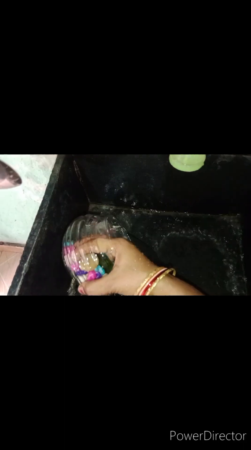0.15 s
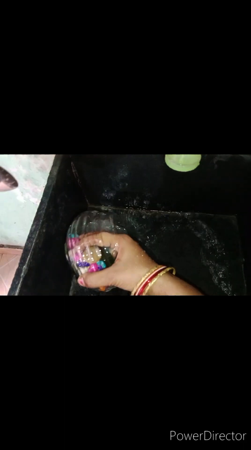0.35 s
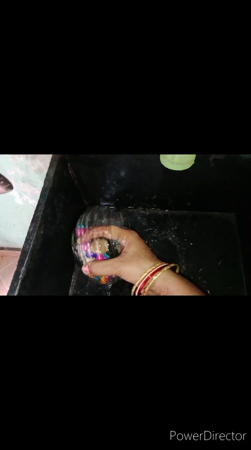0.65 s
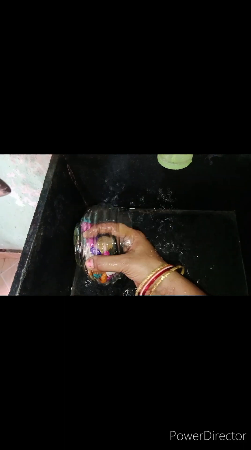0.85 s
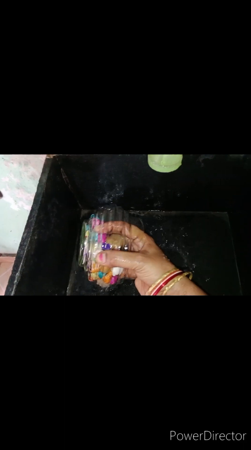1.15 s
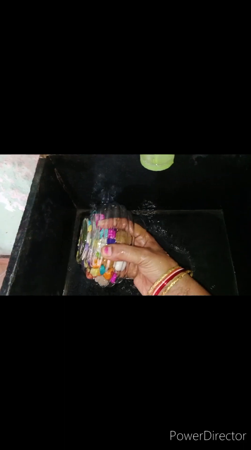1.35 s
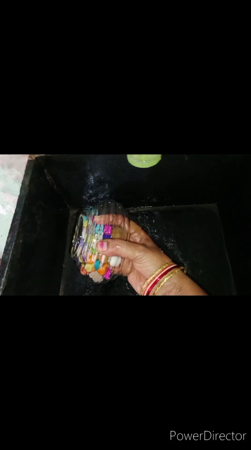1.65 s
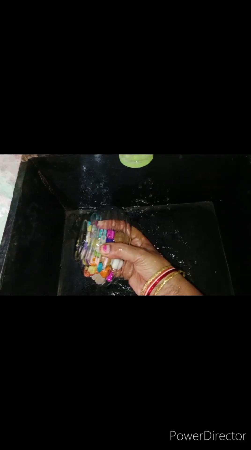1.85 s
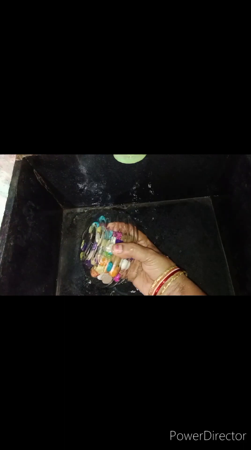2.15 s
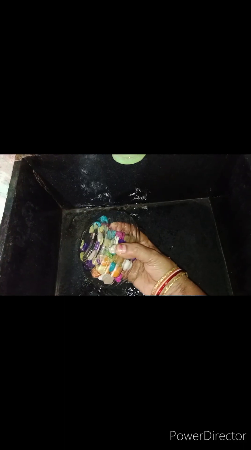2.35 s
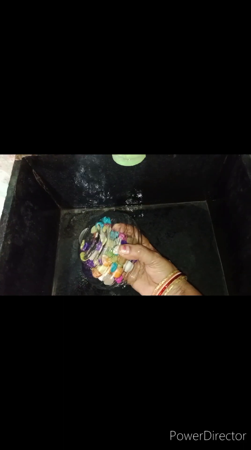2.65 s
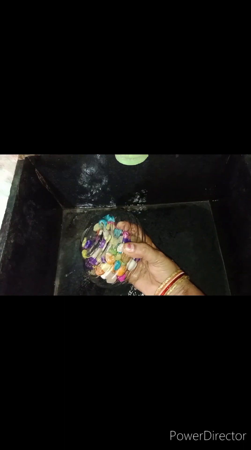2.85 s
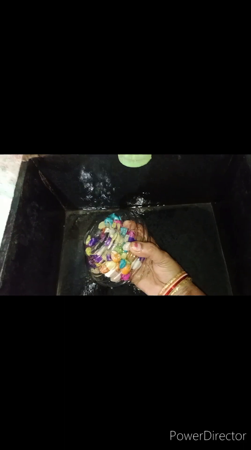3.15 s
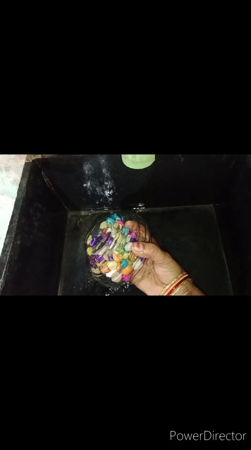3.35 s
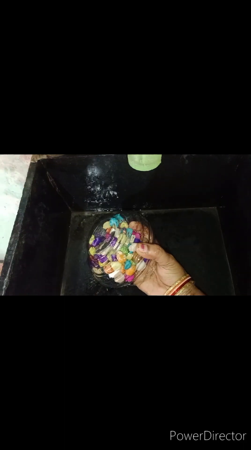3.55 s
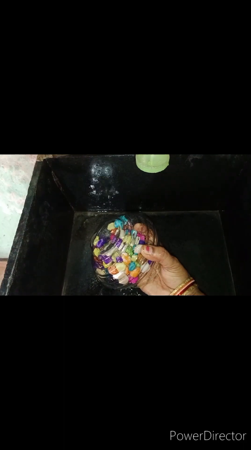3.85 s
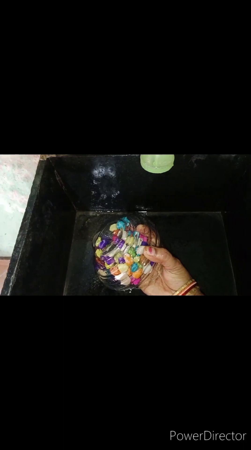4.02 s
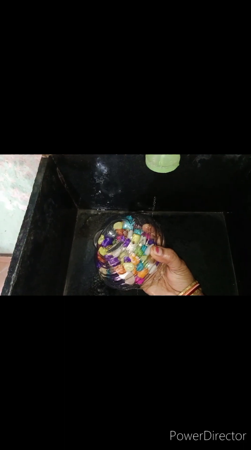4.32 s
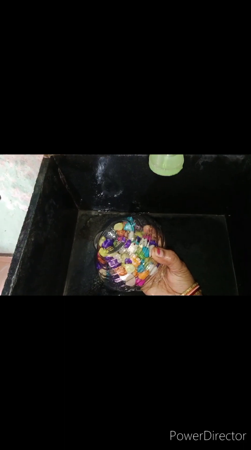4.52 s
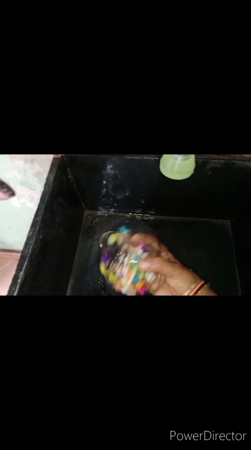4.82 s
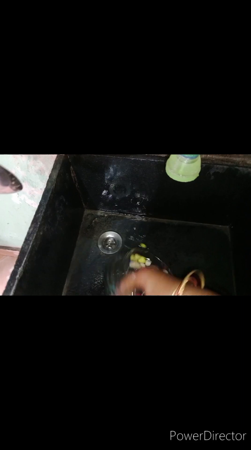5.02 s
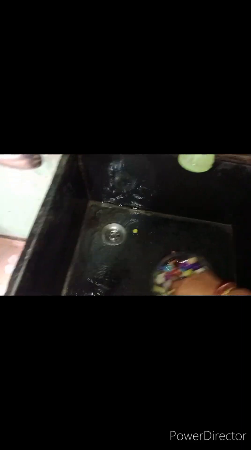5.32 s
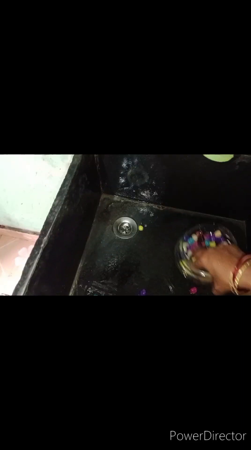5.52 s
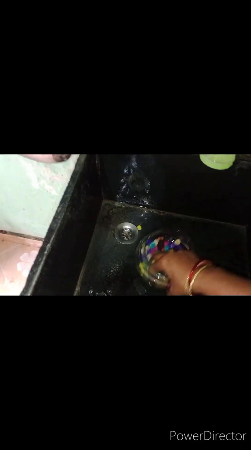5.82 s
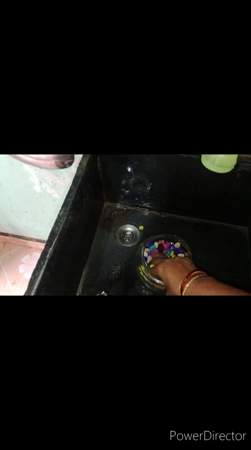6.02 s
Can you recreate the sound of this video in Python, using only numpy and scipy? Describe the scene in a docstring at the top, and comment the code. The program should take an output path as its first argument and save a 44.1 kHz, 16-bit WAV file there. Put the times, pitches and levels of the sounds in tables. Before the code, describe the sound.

Very close in a small hard kitchen, wet pebbles clack and clink in a glass bowl as rinse water gurgles out. A lull with drips follows, then bursts of hollow knocking and stone cracks. Finally the bowl is shaken hard, rubbing the stone sink with thumps of microphone overload, and after a short pause is set down.

```python
"""Wet pebbles in a glass bowl

A hand tips the bowl over a stone sink: blows and churned pebbles crack as noise bursts, and ring
tuned glass, the air in the bowl and the packed pile. The bowl hums in decaying sines, rubs along the
sink in dense slips and lands on the slab. Rinse water pours as filtered noise, gurgles in gliding sine
bubbles and drips in short ticks. Noise tails give a small kitchen's answer, over a quiet hush; all of
it is heard close up through a phone's microphone, with low thumps as it overloads."""
import sys
import numpy as np
from scipy import signal
from scipy.fft import rfft, irfft, next_fast_len
from scipy.io import wavfile

SR = 44100
rng = np.random.default_rng(int(sys.argv[2]) if len(sys.argv) > 2 else 0)


def master(y):
    """Save y as 16-bit WAV."""
    cut = np.clip(np.atleast_2d(y).T, -1, 1)
    pcm = np.round(cut * 32767)  # scale
    wavfile.write(sys.argv[1], SR, pcm.astype(np.int16))


N = 272538
TIME = np.arange(N) / SR
AGE = np.arange(SR // 3) / SR  # seconds since a contact; each is cut off after a third of a second

# Levels in the event tables are relative: each layer has its own trim in dB.
# Single pebble blows. Each row: time in seconds, peak level in dB, glass clink in dB against the blow.
PEBBLE_BLOWS = [(0.0532, 0.5, -13), (0.0687, -8, -11), (0.1206, -15, -8), (0.1483, -14.5, -5),
                (0.1942, -15.5, -6.5), (0.2741, -14.5, -9.5), (0.3205, -6, -15), (0.3617, -7.5, -2.5),
                (0.4191, -11.5, -6), (0.4487, -12.5, -8), (0.5245, -16.5, -23.5), (0.623, -34, -9.5),
                (0.6888, -12, -6.5), (0.7157, -9, -9), (0.7883, -25.5, -9.5), (1.3355, -20.5, -12.5),
                (1.3534, -19.5, -8), (1.4375, -19.5, -3), (1.6238, -6, -19), (1.6608, -2.5, -10.5),
                (1.6952, 1, -12), (1.7397, -1, -11.5), (1.7841, -4.5, -9), (1.8381, -6, -9),
                (1.9126, -2.5, -13), (1.9435, -9, -9), (1.9789, -8.5, -20.5), (2.074, -15, -19.5),
                (2.374, -33, -6), (2.452, -23, -9), (2.622, -18.5, -9.5), (2.6649, -4, -12),
                (2.6932, -5.5, -14.5), (2.802, -10, -23), (2.8567, -9, -12.5), (2.959, -12.5, -19),
                (2.9734, -3.5, -15), (3.0047, 1, -13.5), (3.7444, -7, -21.5), (3.7604, -7.5, -21),
                (3.8094, 1.5, -17.5), (3.8214, -0.5, -16.5), (3.8913, -1, -20.5), (3.9429, -11.5, -14),
                (3.9873, -4, -16.5), (4.009, -9, -18), (4.4897, -15, -12.5), (4.5241, -19.5, -12.5),
                (4.5661, -16, -12.5), (4.7447, -4.5, -18.5), (4.7999, -3.5, -14.5), (4.8232, -9.5, -16.5),
                (4.8694, -2.5, -10), (4.9003, 1, -12), (4.9104, -2, -11.5), (4.9369, -2.5, -14.5),
                (4.9653, -5, -17), (4.9925, -7.5, -13.5), (5.0326, -2.5, -20), (5.0668, -3.5, -19),
                (5.1078, -5.5, -6), (5.1345, -2, -10), (5.1979, 0.5, -22.5), (5.2448, -1.5, -25.5),
                (5.3532, -6.5, -19.5), (5.3948, -1.5, -19.5), (5.4158, -3, -32), (5.5242, -9, -18.5),
                (5.5495, -4, -35), (5.5712, -6.5, -37), (6.132, -12.5, -13.5), (6.153, -6.5, -20)]
# Blows that set the whole bowl humming. Each row: time in seconds, level in dB.
BOWL_HUMS = [(0.687, -31), (1.912, -20), (2.505, -51), (5.244, -13), (5.504, -21.5), (6.131, -13.5)]
# Low thumps as the microphone overloads on the hardest hits. Each row: time in seconds, level in dB.
MIC_OVERLOADS = [(1.77, -9.5), (3.811, -30.5), (3.891, -24), (4.747, -4.5), (4.8, -11), (5.03, -17),
                 (5.245, -16), (5.303, -9.5), (5.376, -19.5), (5.394, -7), (5.415, -11)]
# The bowl is put down on the stone. Each row: time in seconds, level in dB.
BOWL_LANDINGS = [(6.129, -14)]
# The clearest drops tick on the sink. Each row: time in seconds, level in dB.
CLEAR_DRIPS = [(0.876, -36), (0.9314, -42), (1.0051, -39), (1.2768, -35), (2.159, -36), (2.1971, -33.5),
               (2.3319, -38), (3.1483, -36), (3.3892, -42), (3.694, -29.5), (4.2343, -40), (4.2941, -40),
               (4.4404, -36.5)]
# Air gulps through the draining water. Each row: time in seconds, level in dB, starting pitch in Hz,
# glide in octaves per second (negative falls).
AIR_GULPS = [(.054, -18.5, 895, -6.5), (.06, -16.5, 1200, 5), (.123, -10, 1309, 11), (.452, -28, 1280, 4),
             (.51, -29, 1366, -1), (.569, -29.5, 1360, 10), (1.508, -27, 1363, 6.5), (2.71, -26, 1643, 1.5),
             (2.735, -32, 1370, 3), (2.772, -30.5, 1310, 6.5), (3.165, -49, 1850, -1.5),
             (3.302, -52, 3270, 3.5), (3.524, -37, 1572, 23)]
# Hand strokes that set the small stones jostling. Each row: start, peak and end in seconds,
# crack level in dB, clink level in dB.
CHURN_STROKES = [(0, .08, 0.5, -25.5, -27.5), (1.68, 1.85, 1.917, -17.5, -21.5),
                 (4.83, 5.21, 5.58, -14.5, -26)]
# Strokes in which the bowl rubs on the sink. Each row: start, peak and end in seconds,
# rumble level in dB, scrape level in dB.
RUB_STROKES = [(1.37, 1.48, 1.57, -46.5, -66), (1.72, 1.93, 2.005, -52, -43), (4.59, 4.62, 4.72, -34, -30),
               (4.75, 4.95, 5.52, -35, -33)]
# Flow of the running water. Each row: time in seconds, level in dB.
WATER_FLOW = [(0, -40), (.45, -47.5), (.62, -59.5), (1.1, -62), (1.3, -65.5), (2.25, -69), (2.7, -49),
              (3.4, -71), (6.18, -79.5)]
# The hand cups the bowl's mouth and the knock turns hollow. Each row: time in seconds,
# hollow share of the knock's power from 0 to 1.
CUPPED_SHARE = [(1.3, 0.05), (1.65, 0.72), (1.95, 0.87), (2.2, 0.04), (6.1, 0.3)]
# The pile's knock against the crack as the bowl is turned. Each row: time in seconds, level in dB.
PILE_KNOCK_LEVEL = [(.75, -28), (1.34, -18), (1.66, -20.5), (1.8, -1), (1.95, -0.5), (2.07, -23),
                    (2.66, -15), (2.86, -28.5), (3.75, -17.5), (4.5, -12), (4.9, -9), (5.5, -13.5)]

# Ringing of the glass. Each row: mode in Hz, width in Hz, level in dB drained, level in dB holding water.
GLASS_MODES = [(1772, 21, -9, 6.5), (2242, 71, -6.5, 1.5), (2386, 26, -3, -1), (2644, 29, -8.5, -8),
               (2889, 65, -7, 6), (3033, 19, -3.5, -9.5), (3137, 100, 0.5, -24), (3314, 43, 0, 2.5),
               (3560, 20, -5, -2.5), (3790, 25, -6.5, -36.5), (3876, 90, -10.5, -2), (4250, 29, -10, -15.5)]
# Highest modes of the glass. Each row: mode in Hz, width in Hz, level in dB.
CHIME_MODES = [(6850, 60, -2), (7170, 50, -2), (7710, 50, -2), (8490, 70, -5), (9790, 80, 0),
               (10290, 80, -1), (11900, 100, -3)]
# Air in the bowl. Each row: mode in Hz, width in Hz, level in dB.
HOLLOW_MODES = [(890, 34, 4), (968.6, 25, 2), (2152, 110, -3.5)]
# The packed pebbles and sink. Each row: mode in Hz, width in Hz, level in dB.
PILE_MODES = [(1080, 63, -16), (1274, 26, 10.5), (1370, 110, 10.5), (1686, 39, -8), (1700, 25, -14.5)]
# The many pitches of the stones, blurred together. Each row: centre in Hz, width in Hz, level in dB.
CLATTER_BANDS = [(1500, 400, -5), (2250, 230, -3), (3200, 1000, 0), (4350, 400, -5)]

# Tone curves; only their shape counts. Stone on stone. Each row: frequency in Hz, level in dB per Hz.
CRACK_TONE = [(4000, -45), (4900, -30), (5400, -13), (6000, -9), (6700, -2), (8000, -2), (8800, -5),
              (9400, -11), (9850, 1), (10600, 0), (11400, -5), (12500, -6), (13900, -14), (15400, -13),
              (15900, -50)]
# The microphone's overload. Each row: frequency in Hz, level in dB per Hz.
OVERLOAD_TONE = [(20, -38), (45, -17.5), (75, -2), (230, 0), (600, -4), (1200, -11.5), (3000, -35.5)]
# The struck stone slab. Each row: frequency in Hz, level in dB per Hz.
SLAB_TONE = [(88, -45), (150, -36), (588, -18), (661, -20.5), (780, -19), (837, -15), (1400, -15.5),
             (2280, -33.5), (2500, -40), (3250, -60), (5500, -120)]
# Low part of the rubbing. Each row: frequency in Hz, level in dB per Hz.
RUMBLE_TONE = [(30, -18), (70, -10), (110, -4), (170, -0.5), (240, -4.5), (340, -28.5), (700, -39.5),
               (4000, -100)]
# Upper part of the rubbing. Each row: frequency in Hz, level in dB per Hz.
SCRAPE_TONE = [(150, -37.5), (280, 4), (450, 6.5), (560, 5), (700, -9), (1100, -26), (2500, -57.5),
               (5000, -100)]
# Fizz of the pour. Each row: frequency in Hz, level in dB per Hz.
POUR_TONE = [(300, -3), (650, -8.5), (1000, -15.5), (1400, 3), (2300, -6.5), (3400, -13), (4800, -37.5),
             (7000, 0.5), (12000, -7), (16000, -24)]
# A drop on wet stone. Each row: frequency in Hz, level in dB per Hz.
TICK_TONE = [(1500, -24), (3300, -18), (4800, -40), (6000, -18), (7000, 0), (9300, -5), (10300, 0),
             (13000, -6), (15800, -13)]
# Hush of the kitchen. Each row: frequency in Hz, level in dB per Hz.
HUSH_TONE = [(15, -29.5), (25, -2), (43, -17), (141, 14), (200, -1.5), (545, -1), (1040, -8.5), (1330, 3),
             (1650, -21), (4870, -29), (6210, -29.5), (7510, -19), (9320, -22.5), (10700, -7.5),
             (16000, -39)]

DRAINED_S = 1.1  # the bowl holds water until then
REBOUND_S, REBOUND_SCATTER_S, REBOUND_DB = .016, .0059, -10  # a stone falls back on its neighbours
# A blow that meets the glass squarely also knocks the pile harder (dB per dB, dB).
KNOCK_FOLLOWS_GLASS, USUAL_CLINK_DB = .43, -7.5
HUM_FULL_HZ, HUM_DRAINED_HZ, HUM_SCATTER_HZ = 697, 642.6, 8.5  # lowest mode, with and without water
HUM_T60 = .2  # seconds; the hand damps the bowl
DRIPS_PER_S, STRAY_DRIP_DB = 3, -46  # fainter drops at random, before the drip trim
HUSH_DB = -70
NOTCH_HZ, NOTCH_WIDTH_HZ, NOTCH_DB = 4763, 130, -8.5  # band swallowed by the microphone's port
TOP_HZ = 15700  # nothing is kept above


def pebbles(crack_db=-2, clink_db=-2, hollow_db=0, knock_db=-1,
            churn_db=-2, churn_clink_db=-3, churn_knock_db=0, clatter_db=-7):
    """Blows and churning crack, ring the glass and the air inside it, and knock the pile."""
    crack, clink, knock, tinks = blows()
    stirring = strokes(CHURN_STROKES, axis=3, swell_db=8.5, sag_db=0, attack_s=.054, release_s=.14)
    on_glass = strokes(CHURN_STROKES, axis=4, swell_db=5.5, sag_db=12, attack_s=.072, release_s=.15)
    stone_rattle = jostle(rate=260, spread_db=2, t60=.045)
    glass_rattle = jostle(rate=330, spread_db=3, t60=.024)
    pile_rattle = jostle(rate=230, spread_db=2, t60=.03)
    crack = crack + amp(churn_db) * stirring * stone_rattle
    clink = clink + amp(churn_clink_db) * on_glass * glass_rattle
    knock = knock + amp(churn_knock_db + knocking(TIME)) * stirring * pile_rattle

    full = TIME < DRAINED_S
    dulled = signal.lfilter(*signal.butter(2, 12000, fs=SR), crack)
    crack = np.where(full, dulled, crack)  # water dulls the cracks
    chime = amp(-11) * resonate(crack, CHIME_MODES, skirt=.15)
    stone = amp(crack_db) * (coloured(crack, CRACK_TONE) + chime)

    modes = np.array(GLASS_MODES)
    drained_glass = resonate(clink * ~full, modes[:, :3], skirt=.037)
    full_glass = resonate(clink * full, modes[:, [0, 1, 3]], skirt=.014)
    glass = amp(clink_db) * (drained_glass + full_glass)
    clatter = amp(clatter_db) * resonate(clink, CLATTER_BANDS, skirt=.3)

    cupped = np.clip(np.interp(TIME, *np.transpose(CUPPED_SHARE)), 0, 1)
    hollow = amp(hollow_db) * resonate(knock * np.sqrt(cupped), HOLLOW_MODES, skirt=.16)
    pile = amp(knock_db) * resonate(knock * np.sqrt(1 - cupped), PILE_MODES, skirt=.9)
    return stone + glass + clatter + hollow + pile + tinks


def blows(force_db=-9, glass_db=4, ping_db=-6, tink_db=-3, tock_db=-4, lead_in_db=-19):
    """Each blow has a faint noise lead-in, rebounds once and rings at pitches of its own."""
    crack, clink, knock, tinks = np.zeros((4, N))
    for s, peak_db, glass_rel in PEBBLE_BLOWS:
        db = peak_db + force_db
        clink_rel = glass_rel + glass_db
        knock_rel = knocking(s) + KNOCK_FOLLOWS_GLASS * (clink_rel - USUAL_CLINK_DB)

        ping = amp(ping_db) * own_ring(6400, 11000, t60=.011, count=6)
        strike = burst(t60=.075, room_db=-12.5, room_t60=.2, hold=.0018)
        add(crack, s, amp(db) * (ping + strike))
        lead_in_s = s - rng.uniform(.0025, .006)  # a few milliseconds before the blow
        lead_in = burst(t60=.11, room_db=-16.5, room_t60=.25, hold=.0014)
        add(crack, lead_in_s, amp(db + lead_in_db) * lead_in)

        on_glass = burst(t60=.055, room_db=-17, room_t60=.25, hold=.002)
        add(clink, s, amp(db + clink_rel) * on_glass)
        on_pile = burst(t60=.055, room_db=-13, room_t60=.2, hold=.002)
        add(knock, s, amp(db + knock_rel) * on_pile)
        tink = own_ring(2400, 4200, t60=.14, count=3)
        add(tinks, s, amp(db + clink_rel + tink_db) * tink)
        tock = own_ring(850, 1700, t60=.071, count=3)
        add(tinks, s, amp(db + knock_rel + tock_db) * tock)

        again = s + REBOUND_S + REBOUND_SCATTER_S * rng.uniform(-1, 1)
        rebound = burst(t60=.077, room_db=-10, room_t60=.15, hold=.0007)
        add(crack, again, amp(db + REBOUND_DB) * rebound)
        rebound_tink = own_ring(2100, 4200, t60=.11, count=3)
        add(tinks, again, amp(db + clink_rel + REBOUND_DB) * rebound_tink)
    tink_band = signal.butter(3, [600, 4300], "band", fs=SR, output="sos")
    return crack, clink, knock, signal.sosfilt(tink_band, tinks)


def knocking(s):
    """Level of the pile's knock against the crack at time s, in dB."""
    return np.interp(s, *np.transpose(PILE_KNOCK_LEVEL))


def bowl(hum_db=-4, faint_hum_db=-17, twin_db=-8, slab_db=-3):
    """The bowl's lowest mode, which every blow stirs, and its landing on the slab."""
    hum, slab = np.zeros((2, N))
    stirred = [(s, db + knocking(s) + faint_hum_db) for s, db, _ in PEBBLE_BLOWS]
    for s, db in list(BOWL_HUMS) + stirred:
        mode_hz = HUM_FULL_HZ if s < DRAINED_S else HUM_DRAINED_HZ
        hz = mode_hz + HUM_SCATTER_HZ * rng.standard_normal()
        twin_hz = hz + 16 * rng.standard_normal()  # the uneven load splits the mode in two
        tone = np.sin(2 * np.pi * hz * AGE) + amp(twin_db) * np.sin(2 * np.pi * twin_hz * AGE)
        swell_and_decay = fade(HUM_T60) - fade(.0087)
        add(hum, s, amp(db + hum_db) * tone * swell_and_decay)
    for s, db in BOWL_LANDINGS:
        landing = burst(t60=.24, room_db=-5.5, room_t60=.41, hold=.0014)
        add(slab, s, amp(db + slab_db) * landing)
    return hum + coloured(slab, SLAB_TONE)


def mic_overloads(low_db=-12, low_hz=130, low_t60=.019, noise_db=-3):
    """The overloading microphone thumps: a short low sine and a noise burst, both filtered dull."""
    overload = np.zeros(N)
    for s, db in MIC_OVERLOADS:
        noise = burst(t60=.018, room_db=-35, room_t60=.2, hold=.003)
        low = np.sin(2 * np.pi * low_hz * AGE) * fade(low_t60)
        add(overload, s, amp(db) * (amp(low_db) * low + amp(noise_db) * noise))
    return coloured(overload, OVERLOAD_TONE)


def rubbing(rumble_db=0, scrape_db=0):
    """Glass grinds over wet stone in a dense run of tiny slips."""
    low_slips = coloured(grains(rate=2500, spread_db=0), RUMBLE_TONE)
    high_slips = coloured(grains(rate=2500, spread_db=0), SCRAPE_TONE)
    low_gain = strokes(RUB_STROKES, axis=3, swell_db=6.5, sag_db=-2, attack_s=.06, release_s=.34)
    high_gain = strokes(RUB_STROKES, axis=4, swell_db=7.5, sag_db=3.5, attack_s=.077, release_s=.14)
    return amp(rumble_db) * low_gain * low_slips + amp(scrape_db) * high_gain * high_slips


def water(pour_db=-4, trickle_db=-8, drip_db=-10, drip_ring_db=-4, bubble_db=3, patter_db=-72, echo_db=-4):
    """The pour fizzes and trickles in small bubbles, drops tick, and big bubbles gulp."""
    drops, gulps, trickle = np.zeros((3, N))
    stray_times = rng.random(size=round(DRIPS_PER_S * N / SR)) * N / SR
    strays = [(s, STRAY_DRIP_DB) for s in stray_times]
    for s, db in list(CLEAR_DRIPS) + strays:
        tick = burst(t60=.03, room_db=-17, room_t60=.16, hold=.001)
        ring = amp(drip_ring_db) * own_ring(6500, 11000, t60=.05, count=2)
        add(drops, s, amp(db + drip_db) * (tick + ring))
    patter = amp(patter_db) * jostle(rate=30, spread_db=4, t60=.06)

    for s, db, hz, rise in AIR_GULPS:
        add(gulps, s, amp(db + bubble_db) * bubble(hz, rise, t60=.051))
    small_times = rng.random(size=330) * N / SR
    small_scatter = np.clip(rng.standard_normal(size=(330, 2)), -2, 2)
    for s, (size, pitch) in zip(small_times, small_scatter):
        add(trickle, s, amp(3 * size) * bubble(1750 * np.exp(.2 * pitch), rise=2, t60=.028))
    flow = gains(WATER_FLOW, axis=1)
    bubbles = gulps + amp(trickle_db) * flow * unit(trickle)
    echo = rng.standard_normal(len(AGE)) * fade(.14)
    echo /= np.linalg.norm(echo)
    bubbles += amp(echo_db) * signal.fftconvolve(bubbles, echo)[:N]

    fizz = coloured(jostle(rate=1700, spread_db=2, t60=.1), POUR_TONE)
    return coloured(drops + patter, TICK_TONE) + bubbles + amp(pour_db) * flow * fizz


def bubble(hz, rise, t60):
    """A bubble swells in and its pitch glides by rise octaves per second, for its first 60 ms."""
    pitch = hz * 2 ** (rise * np.minimum(AGE, .06))
    return np.sin(2 * np.pi * np.cumsum(pitch) / SR) * (fade(t60) - fade(t60 / 4))


def kitchen_hush():
    """Steady noise, shaped to the quiet of the kitchen."""
    return amp(HUSH_DB) * coloured(rng.standard_normal(N), HUSH_TONE)


def burst(t60, room_db, room_t60, hold):
    """One contact: a thicket of echoes between the sink's close walls, then the kitchen's tail."""
    near = np.minimum(fade(t60) * amp(60 * hold / max(t60, .01)), 1)  # a short plateau, then decay
    tail = amp(room_db) * fade(room_t60)
    return rng.standard_normal(len(AGE)) * np.hypot(near, tail)


def own_ring(low_hz, high_hz, t60, count):
    """A few random modes for each contact, near rms 1 at the start."""
    place, size, phase = rng.random((3, count, 1))
    size = .3 + size
    size = size / np.sqrt(np.sum(size ** 2) / 2)
    hz = low_hz + place * (high_hz - low_hz)
    return np.sum(size * np.sin(2 * np.pi * (hz * AGE + phase)), 0) * fade(t60)


def grains(rate, spread_db):
    """Random impulses of uneven size, rate per second on average, rms 1."""
    hits = rng.random(N) < rate / SR
    size = rng.standard_normal(N)
    spread = amp(spread_db * np.clip(rng.standard_normal(N), -2, 2))
    return unit(hits * size * spread)


def jostle(rate, spread_db, t60):
    """Many small contacts, each with its short echo, rms 1."""
    echo = rng.standard_normal(len(AGE)) * fade(t60)
    return unit(signal.fftconvolve(grains(rate, spread_db), echo)[:N])


def strokes(rows, axis, swell_db, sag_db, attack_s, release_s):
    """Gain per sample: each stroke sets in, swells to its peak, sags towards its end and dies away."""
    gain = np.zeros(N)
    for row in rows:
        start, peak, end = row[:3]
        held = np.interp(TIME, [start, peak, end], [sag_db / 2 - swell_db, 0, -sag_db / 2 - swell_db])
        outside = np.maximum(start - TIME, 0) / attack_s + np.maximum(TIME - end, 0) / release_s
        gain += amp(row[axis] + held - 60 * np.minimum(outside, 2))  # 60 dB per attack or release time
    return gain


def gains(rows, axis):
    """Gain per sample from one dB column of a curve."""
    rows = np.array(rows)
    return amp(np.interp(TIME, rows[:, 0], rows[:, axis]))


def fade(t60):
    """Exponential decay after a contact, 60 dB in t60 seconds."""
    return amp(-60 * AGE / max(t60, .002))


def resonate(x, modes, skirt):
    """Ring x through (Hz, width, dB) modes; little radiates far outside their range."""
    hz = np.array(modes)[:, 0]
    low_hz = hz.min() / (1 + abs(skirt))
    high_hz = min(hz.max() * (1 + abs(skirt)), SR / 2 - 1)
    band = signal.butter(3, [low_hz, high_hz], "band", fs=SR, output="sos")

    def response(f):
        ring = sum(amp(db) * 1j * f * w / (c * c - f * f + 1j * f * w) for c, w, db in modes)
        return ring * signal.sosfreqz(band, f, fs=SR)[1]
    return filtered(x, response)


def coloured(x, points):
    """Causal (minimum-phase) filter through (Hz, dB) points."""
    hz, db = np.transpose(points)

    def response(f):
        cepstrum = irfft(np.log(amp(np.interp(np.log(f + 1), np.log(hz), db))))
        cepstrum[1:len(f) - 1] *= 2  # fold the cepstrum so that the filter never sounds ahead of x
        cepstrum[len(f):] = 0
        return np.exp(rfft(cepstrum))
    return filtered(x, response)


def filtered(x, response):
    """Filter x, keeping the power of white noise."""
    size = 2 * next_fast_len(N)
    h = response(np.fft.rfftfreq(size, 1 / SR))
    h = h / np.sqrt(np.mean(abs(h) ** 2))
    return irfft(rfft(x, size) * h, size)[:N]


def add(track, s, sound):
    """Mix a sound into a track at time s."""
    start = max(round(s * SR), 0)
    track[start:start + len(sound)] += sound[:max(N - start, 0)]


def unit(x):
    """Scale to rms 1."""
    return x / np.sqrt(np.mean(x ** 2) + 1e-20)


def amp(db):
    """Decibels to gain."""
    return 10 ** (np.asarray(db) / 20)


def scene():
    """Pebbles, bowl, overload thumps, rubbing and water over the hush of the kitchen."""
    return (pebbles() + bowl() + mic_overloads() + rubbing() + water() + kitchen_hush())[None]


def record(dry):
    """The phone's port cuts a notch; it rounds off the highest peaks and keeps nothing above TOP_HZ."""
    def notch(f):
        return amp(NOTCH_DB * np.exp(-((f - NOTCH_HZ) / NOTCH_WIDTH_HZ) ** 2))
    ported = filtered(dry[0], notch)[None]
    rounded = ported / (1 + abs(ported) ** 8) ** (1 / 8)
    size = 2 * next_fast_len(N)
    kept = np.fft.rfftfreq(size, 1 / SR) < TOP_HZ
    return irfft(rfft(rounded, size) * kept, size)[:, :N]


dry = scene()
out = record(dry)
master(out)
```